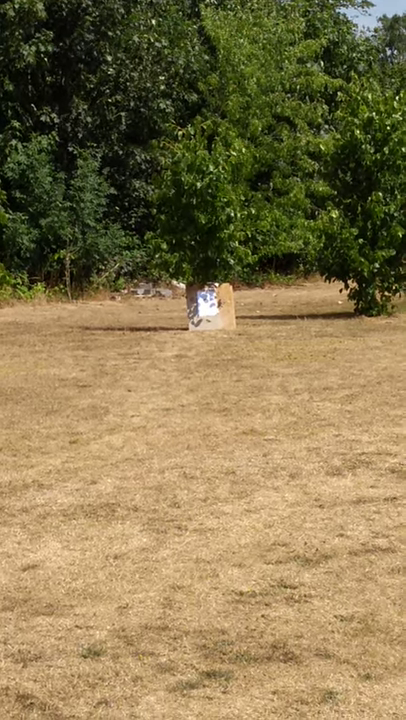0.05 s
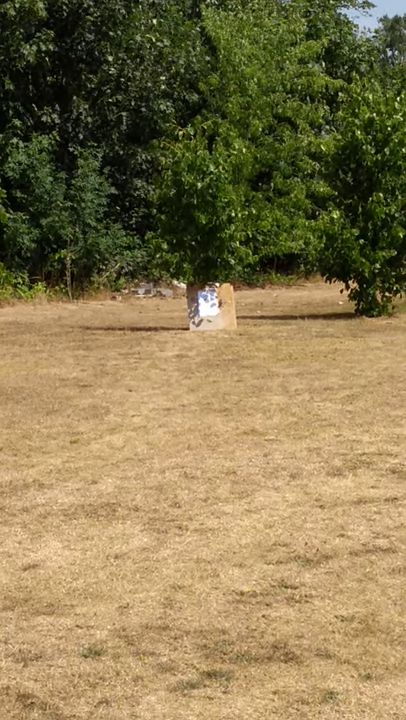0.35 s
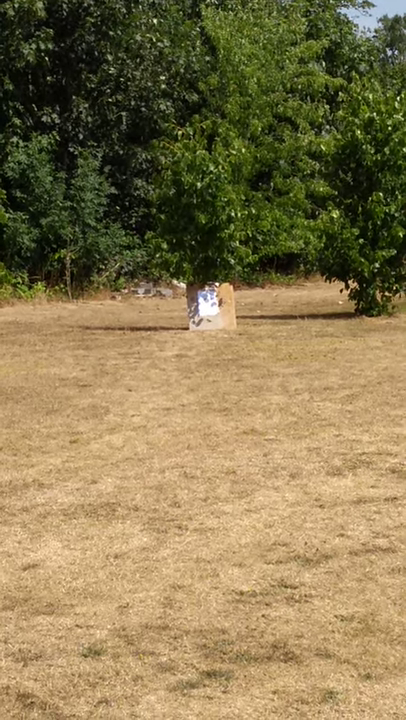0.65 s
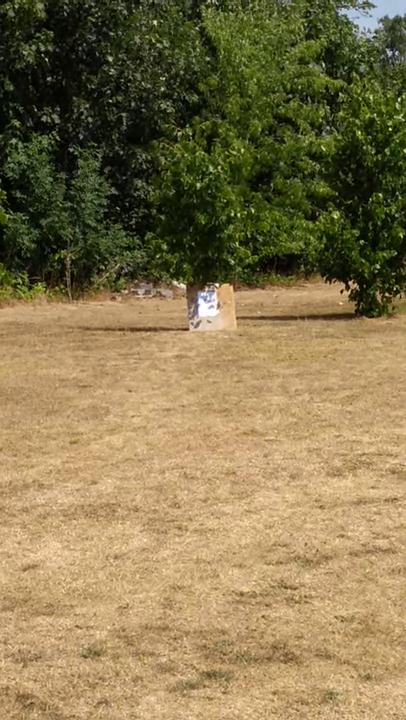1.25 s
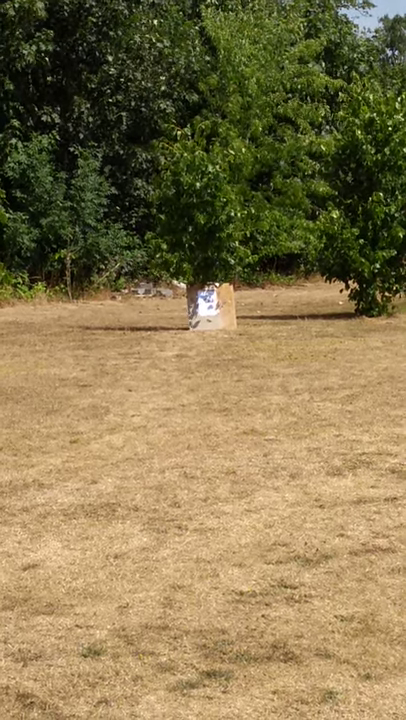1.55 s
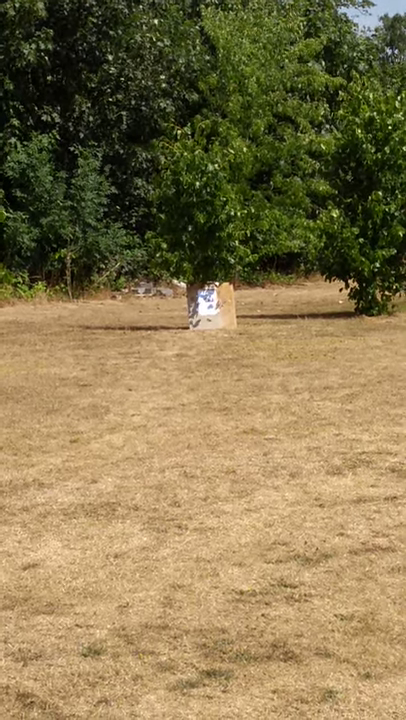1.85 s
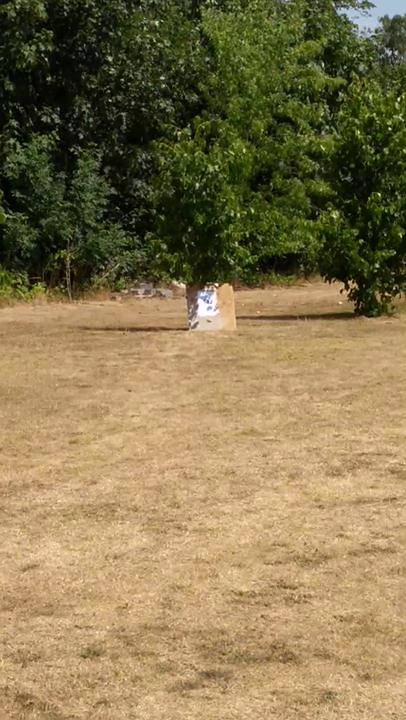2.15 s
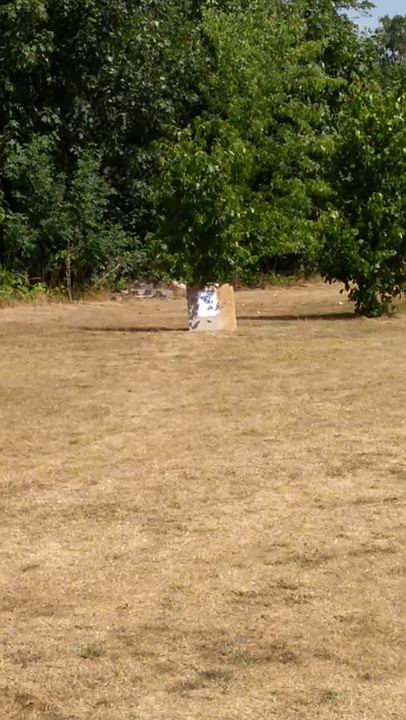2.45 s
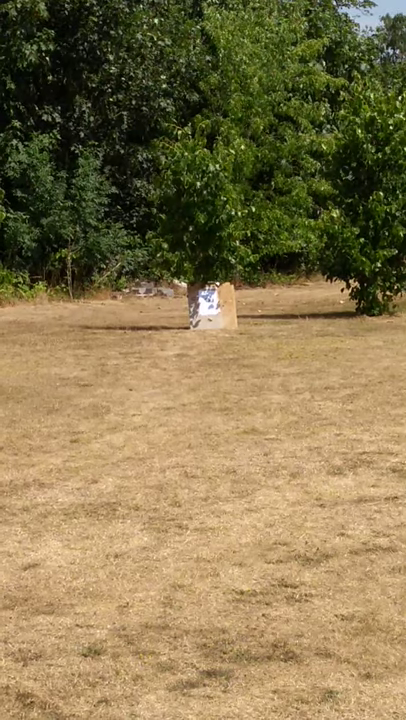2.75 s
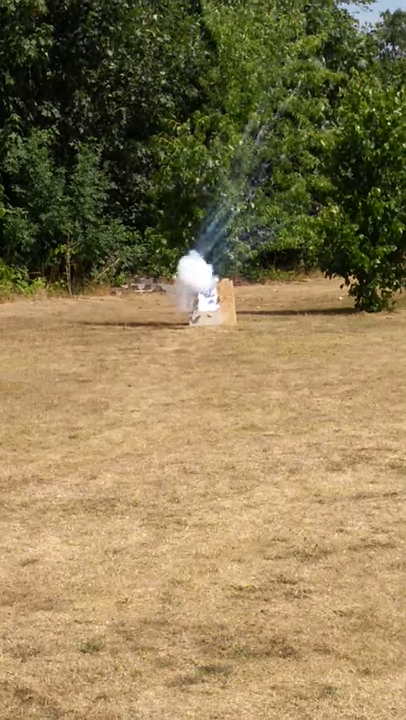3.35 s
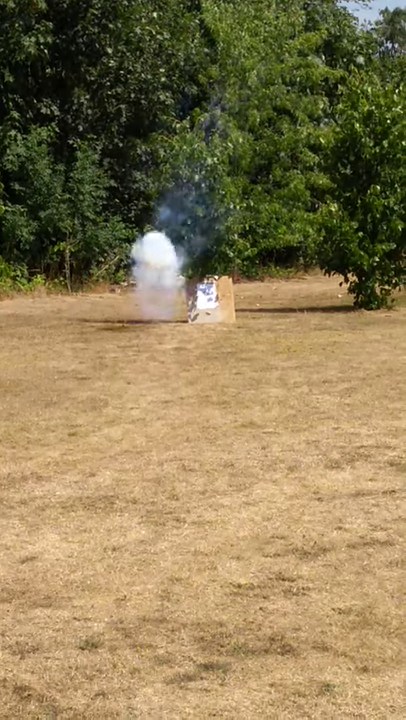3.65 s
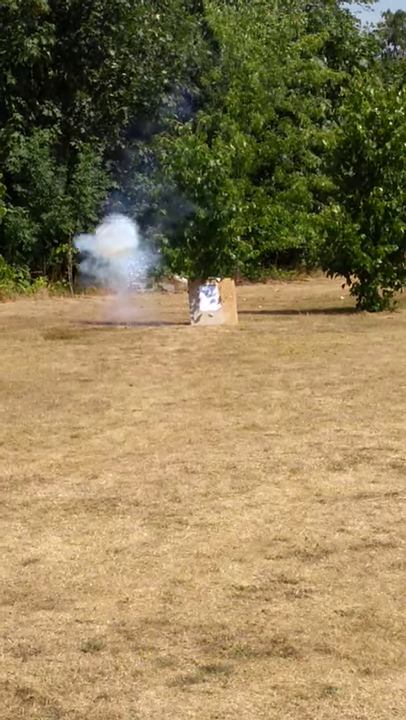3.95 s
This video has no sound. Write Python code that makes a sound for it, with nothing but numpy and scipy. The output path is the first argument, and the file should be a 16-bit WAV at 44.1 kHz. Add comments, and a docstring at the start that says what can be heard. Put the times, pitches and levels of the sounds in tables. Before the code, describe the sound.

An air rifle shot sets off an exploding target in an open field. The first three seconds are quiet: low rumble, soft microphone bumps, a faint distant dove, a few tiny chirps and a small twig snap at 2.5 seconds. The rifle cracks close by at 3.15 seconds with a brief metallic ring. The loud bang follows near 3.35, both distorting, and hissing echoes fade through 4 seconds.

```python
"""An air rifle and a small exploding target in a dry field, heard at a hand-held camera.
First still air and a low rumble, with a far dove, a small bird and handling bumps; at 2.5 s a twig snaps.
At 3.15 s the rifle fires close by: piston and muzzle pulses set its barrel and spring ringing.
A fifth of a second later the target's bang arrives; shot and bang both overload the microphone.
The wood behind the target scatters the bang back as a hissing tail with a few distinct echoes."""
import sys
import numpy as np
from scipy import signal
from scipy.fft import rfft, irfft
from scipy.io import wavfile
from scipy.ndimage import uniform_filter1d

SR = 44100
rng = np.random.default_rng(int(sys.argv[2]) if len(sys.argv) > 2 else 0)


def generate_wav(signal):
    """Clip the signal to [-1, 1] and save it as 16-bit WAV at the path in sys.argv[1]."""
    frames = np.transpose(np.atleast_2d(signal))
    scaled = np.clip(frames, -1, 1) * 32767
    pcm = np.round(scaled).astype(np.int16)
    wavfile.write(sys.argv[1], SR, pcm)


N = 176400
TIME = np.arange(N) / SR


def amp(db):
    return 10 ** (np.asarray(db) / 20)


def curve_at(points, hz):
    """A table's value at hz, on a log-frequency axis."""
    f, value = np.transpose(points)
    return np.interp(np.log(hz + 1), np.log(f + 1), value)


def since(start):
    """Seconds since start, zero before."""
    return np.maximum(TIME - start, 0)


def drift(hz):
    """Random modulation of rms 1, rolling off above hz."""
    x = irfft(rfft(rng.standard_normal(N)) / (1 + (np.fft.rfftfreq(N, 1 / SR) / hz) ** 4), N)
    return x / x.std()


def low_cut(x, hz):
    """Second-order high-pass."""
    return signal.sosfilt(signal.butter(2, hz, "high", fs=SR, output="sos"), x)


# stereo image of the noise layers (frequency [Hz], left-right correlation [0..1])
STEREO_IMAGE = [(30, 0.62), (500, 0.99), (1500, 1), (3000, 1), (5000, 0.87), (8000, 0.51), (14000, 0.85)]
def noise(spectrum, patchy_db, start=0, t60=None, size=256):
    """Stereo noise with a spectrum, random patches and, if given, a decay by band."""
    frames = dict(nperseg=size, noverlap=size * 3 // 4)
    hz, t, white = signal.stft(rng.standard_normal((2, N)), SR, **frames)
    alike = np.clip(curve_at(STEREO_IMAGE, hz), -1, 1)[:, None]
    mid, side = np.sqrt((1 + alike) / 2) * white[0], np.sqrt((1 - alike) / 2) * white[1]
    patches = uniform_filter1d(rng.standard_normal(mid.shape), size=5, axis=0)
    patches = uniform_filter1d(patches, size=5, axis=1)
    db = curve_at(spectrum, hz)[:, None] + patchy_db * patches / patches.std()
    if t60:
        db = db - 60 * np.maximum(t - start, 0) / curve_at(t60, hz)[:, None]
    return signal.istft(np.array([mid + side, mid - side]) * amp(db), SR, **frames)[1][:, :N]


def pulse(start, db, ms):
    """A blast wave: instant rise, a fall to zero in ms, then suction."""
    u = since(start) * 1000 / ms
    return amp(db) * np.clip((TIME - start) * SR, 0, 1) * (1 - u) * np.exp(-u)


def blasts(rows, low_hz):
    """Each blast wave drags a short turbulent hiss behind it."""
    hiss = sum(amp(db) * (TIME > s) * np.exp(-since(s) * 1000 / ms) for s, _, _, db, ms in rows)
    white = noise([(1, 0), (SR, 0)], patchy_db=0)
    return low_cut(sum(pulse(*row[:3]) for row in rows) + hiss * white, low_hz)


def ring(start, modes):
    """Damped modes struck together."""
    t = since(start)
    return sum(amp(db - 60 * t / t60) * np.sin(2 * np.pi * hz * t) for hz, db, t60 in modes)


def scatter(start, spectrum, t60, rise_s, flutter_db):
    """Countless small reflections that build up, flutter and die away."""
    swell = np.sqrt(np.minimum(since(start) / rise_s, 1))
    flutter = amp(flutter_db * drift(130))
    return swell * flutter * noise(spectrum, patchy_db=2, start=start + rise_s, t60=t60)


def smeared(call, fade_s):
    """A call as it arrives through foliage: a cloud of echoes that fades."""
    echoes = rng.standard_normal((2, SR // 2)) * np.exp(-TIME[:SR // 2] / fade_s)
    return signal.fftconvolve(call[None], echoes / np.linalg.norm(echoes[0]), axes=1)[:, :N]


# tone of the air bed and of the rumble (frequency [Hz], level [dB])
AIR_SPECTRUM = [(25, -56.5), (60, -39.5), (130, -39), (220, -46), (400, -45), (700, -46), (1300, -57.5),
                (2200, -57.5), (3400, -57), (8000, -58), (14000, -62)]
RUMBLE_SPECTRUM = [(25, -35), (70, -13), (130, 0), (200, -1), (280, -18), (400, -45), (1000, -41),
                   (14000, -86)]
# fader ride on the rumble (time [s], gain [dB])
RUMBLE_RIDE = [(0, -28), (.2, -25), (.4, -25), (.55, -16), (.75, -31.5), (1.05, -24.5), (1.2, -21),
               (1.5, -17.5), (1.8, -18.5), (2.1, -20.5), (2.25, -16), (2.5, -27), (2.72, -16), (2.9, -42),
               (4, -52)]
def field():
    """Steady outdoor hush and a low rumble that swells and fades."""
    ride = amp(np.interp(TIME, *np.transpose(RUMBLE_RIDE)) + .5 * drift(23))
    hush = noise(AIR_SPECTRUM, patchy_db=2, size=2048) * amp(.5 * drift(1))
    return hush + ride * noise(RUMBLE_SPECTRUM, patchy_db=1.06, size=2048)


# the dove's phrase (time [s], length [s], level [dB], start pitch [Hz], mid pitch [Hz], end pitch [Hz])
DOVE_COOS = [(0.117, 0.3, -52.5, 480, 491, 435), (1.137, .2, -52.5, 485, 449, 417),
             (1.809, 0.17, -51.5, 465, 495, 518), (1.92, 0.31, -55, 510, 532, 498),
             (2.213, .56, -54.5, 515, 501.7, 471.5), (2.695, 0.29, -60.5, 475, 464, 470),
             (2.897, .15, -48.5, 490, 465, 427)]
def dove():
    """Far, nearly pure coos on a curve of pitch, blurred by the trees."""
    out = np.zeros(N)
    blur = 1 + 0.99 * (drift(hz=38.45) + 1j * drift(hz=38.45))  # wavers both level and phase
    for start, length, db, *pitches in DOVE_COOS:
        u = np.minimum(since(start) / length, 1)
        hz = np.polyval(np.polyfit([0, .5, 1], pitches, 2), u)
        tone = (blur * np.exp(2j * np.pi * np.cumsum(hz) / SR)).real
        out += amp(db) * abs(np.sin(np.pi * u)) ** 0.69 * tone
    return out + amp(-2) * smeared(out, fade_s=0.034)[0]


# bird calls (time [s], level [dB], start pitch [Hz], end pitch [Hz], glide [s], tail decay [s])
BIRD_CHIPS = [(.15, -53, 4360, 4250, .03, 0.16), (.222, -50, 4380, 5330, 0.033, .04),
              (.610, -49, 5600, 4900, 0.0395, .06)]
def small_bird():
    """Thin gliding chips, each smeared by the foliage."""
    out = np.zeros((2, N))
    for start, db, start_hz, end_hz, glide, fade in BIRD_CHIPS:
        u = np.minimum(since(start) / glide, 1)
        hz = start_hz + (end_hz - start_hz) * u
        call = np.sin(np.pi * u) * np.sin(2 * np.pi * np.cumsum(hz) / SR)
        out += amp(db) * (0.33 * call + smeared(call, fade))
    return out


# thumps of the hand (time [s], level [dB], pitch [Hz])
HAND_BUMPS = [(0.491, -15, 130), (0.505, -23.5, 286), (0.516, -19.5, 232), (1.135, -26.5, 120),
              (1.677, -29, 130), (2.195, -23.5, 140), (2.244, -33, 100), (2.376, -32, 108),
              (2.591, -23, 160), (2.629, -19, 191), (2.630, -38, 357)]
def handling(decay_s=0.0037, dull_hz=445):
    """Soft, muffled bumps on the camera body, a few cycles at most."""
    out = np.zeros(N)
    for start, db, hz in HAND_BUMPS:
        u = since(start) / decay_s
        out += amp(db) * 2 * np.sqrt(u) * np.exp(-u) * np.sin(2 * np.pi * hz * since(start))
    return signal.sosfilt(signal.butter(3, dull_hz, fs=SR, output="sos"), out)


# the snap's wash: tone (frequency [Hz], level [dB]) and decay (frequency [Hz], t60 [s])
TWIG_SPECTRUM = [(1500, -79), (2400, -41), (3300, -51), (4300, -40), (5100, -37), (6200, -67), (12000, -70)]
TWIG_DECAY = [(2400, 0.1), (3500, 0.13), (5000, 0.27)]
def twig(snap_s=2.5):
    """One small dry snap and its short wash."""
    band = signal.butter(3, [2400, 5400], "band", fs=SR, output="sos")
    crack = signal.sosfilt(band, pulse(snap_s + .001, db=-24, ms=.1))
    return crack + scatter(snap_s, TWIG_SPECTRUM, TWIG_DECAY, rise_s=.001, flutter_db=0)


# tone of the deep wood and of the field's far edge (frequency [Hz], level [dB])
WOOD_SPECTRUM = [(60, -55.5), (200, -26.5), (500, -27), (1500, -32.5), (3400, -30.5), (5500, -26),
                 (8000, -38.5), (13000, -46)]
FAR_EDGE_SPECTRUM = [(60, -61), (400, -34.5), (900, -38), (1400, -30.5), (2000, -47), (3400, -49),
                     (6000, -53), (13000, -79)]
# decay of both (frequency [Hz], t60 [s])
WOOD_DECAY = [(200, 1.1), (1500, 2.4), (4000, 1.02), (13000, 0.2)]
def distant_tail():
    """The bang blooms in the deep wood, then slaps back from the far edge of the field."""
    wood = scatter(3.42, WOOD_SPECTRUM, WOOD_DECAY, rise_s=0.2, flutter_db=0.5)
    far_edge = scatter(3.955, FAR_EDGE_SPECTRUM, WOOD_DECAY, rise_s=0.0081, flutter_db=1.5)
    return wood + far_edge


# slaps off trees (time [s], pulse level [dB], pulse length [ms], hiss level [dB], hiss decay [ms])
TREE_SLAPS = [(3.3732, -8, 0.054, -13, 4.8), (3.4090, 8, 0.1, -22, 3), (3.4140, 3, 0.082, -25, 2),
              (3.4230, 11, 0.079, -4.5, 5.2), (3.4325, 1.5, 0.53, -9, 9.6), (3.4555, 4, 0.17, -7.5, 9.6),
              (3.4795, -2, 0.083, -9, 1.5), (3.5210, -14, 0.27, -11.5, 5.2), (3.5430, -7, 0.39, -28, 15),
              (3.6068, 1, 0.16, -11, 4.7), (3.6120, 7.5, 0.067, -30, 1.7), (3.6215, -9, 0.071, -40, 4.5),
              (3.6360, -15, .12, -23, 6.5), (3.6540, 1.5, 0.12, -22, 6.1), (3.7820, -26, 0.63, -42, 3.6),
              (3.9630, -26, .2, -52, 3.6)]
def tree_echoes(dull_hz=3615):
    """Single trees throw back distinct, dulled echoes of the bang."""
    return signal.lfilter(*signal.butter(1, dull_hz, fs=SR), blasts(TREE_SLAPS, low_hz=120))


# the leaves' wash: tone (frequency [Hz], level [dB]) and decay (frequency [Hz], t60 [s])
LEAF_SPECTRUM = [(60, -27.5), (200, -22.5), (370, -12.5), (700, -29.5), (1500, -8), (3400, -11),
                 (5500, -6.5), (8000, -9.5), (13000, -10)]
LEAF_DECAY = [(200, 1), (1500, 0.96), (4000, 0.55), (8000, 0.51), (13000, .38)]
def foliage(start, rise_s, flutter_db):
    """Near leaves scatter a blast into a bright, hissing tail."""
    return scatter(start, LEAF_SPECTRUM, LEAF_DECAY, rise_s, flutter_db)


# the shot's attack: piston, muzzle, reflection
# (time [s], pulse level [dB], pulse length [ms], hiss level [dB], hiss decay [ms])
SHOT_PULSES = [(3.1471, -2, 0.24, 2, 1.83), (3.1514, 19, 0.11, 5.5, 5.3), (3.1587, 20, 0.11, 4, 0.91)]
# ring of barrel and spring (frequency [Hz], level [dB], t60 [s])
RIFLE_RING = [(1116, -6, 0.034), (1446, -6, .035), (2080, -22, 0.038), (2790, -11, 0.031),
              (3200, -15.5, .03), (3458, -3, .035), (4049, -6, 0.038), (5130, -11, 0.041)]
# the wash off the grass: tone (frequency [Hz], level [dB]) and decay (frequency [Hz], t60 [s])
GRASS_SPECTRUM = [(60, -31), (200, -30.5), (420, -9), (900, -12.5), (1500, -12.5), (3400, -21), (7700, -16),
                  (13000, -21)]
GRASS_DECAY = [(200, .25), (1500, 0.17), (5000, .28), (13000, 0.2)]
def rifle():
    """Pressure pulses and ringing metal, a wash off the grass and a weak return from the foliage."""
    muzzle_s = SHOT_PULSES[1][0]
    direct = blasts(SHOT_PULSES, low_hz=40.4) + ring(muzzle_s, RIFLE_RING)
    grass = scatter(muzzle_s, GRASS_SPECTRUM, GRASS_DECAY, rise_s=.004, flutter_db=1)
    return direct + grass + amp(-31) * foliage(3.255, rise_s=.03, flutter_db=.7)


# the bang's attack: first crack, main blast, burst of fragments
# (time [s], pulse level [dB], pulse length [ms], hiss level [dB], hiss decay [ms])
BANG_PULSES = [(3.3594, 8.9, 0.48, 3.2, 4.6), (3.3616, 12.7, 0.4, 2.2, 3.9), (3.3640, 4, 0.048, 3.3, 1.7)]
# brief ring just after the bang (frequency [Hz], level [dB], t60 [s])
BANG_RING = [(323, -11.5, 0.047), (459, -14.5, 0.027), (910, -2, 0.013), (980, -3.5, 0.0083),
             (1670, -5, 0.023), (2547, -10.5, .03), (3304, -5.5, 0.058), (4060, -0.5, 0.036),
             (5360, -8.5, 0.02), (7480, -5.5, 0.04)]
def explosion(low_hz=230):
    """The target bursts with a brief ringing; single trees, near foliage and the distance answer."""
    blast_s = BANG_PULSES[1][0]
    direct = blasts(BANG_PULSES, low_hz) + low_cut(ring(blast_s, BANG_RING), low_hz)
    trees = tree_echoes()
    leaves = foliage(blast_s, rise_s=0.039, flutter_db=1)
    # the foliage also repeats the bang's ring, 5 ms behind its hiss
    tone = ring(0, BANG_RING)[:SR // 90]
    ringing = signal.fftconvolve(leaves, tone[None] / np.linalg.norm(tone), axes=1)[:, :N]
    ringing = amp(-11) * np.roll(ringing, SR // 200, axis=1)
    return direct + trees + leaves + ringing + distant_tail()


def scene():
    """Shot and bang over the quiet field and its small sounds."""
    return rifle() + explosion() + field() + handling() + dove() + small_bird() + twig()


# colour of the microphone behind its small port (frequency [Hz], gain [dB])
MIC_EQ = [(30, -17), (60, -18.5), (100, -23.5), (200, -19.5), (330, -11), (450, -8), (560, -8.5),
          (700, -9.5), (920, -5), (1100, -2), (1350, 0.5), (1700, -2.5), (2000, -8.5), (2270, -18),
          (2750, -8), (3100, -6.5), (3380, -3), (3700, -3.5), (4050, -8), (4600, -16.5), (5300, -5.5),
          (6000, -8), (6800, -15), (7750, -9), (8900, -14), (12000, -12.5), (14000, -24.5)]
def record(dry, overload=0.77, top_hz=14350):
    """Microphone colour, a slightly brighter right port, overload, then the band limit."""
    hz = np.fft.rfftfreq(8192, 1 / SR)
    tilt_db = curve_at([(1500, 0.084), (6000, 0.0), (12000, 0.48)], hz)
    channels = []
    for channel, sign in zip(dry, (-1, 1)):
        log_gain = np.log(amp(curve_at(MIC_EQ, hz) + sign * tilt_db))
        mirrored = np.r_[log_gain, log_gain[-2:0:-1]]
        impulse = np.fft.ifft(np.exp(np.conj(signal.hilbert(mirrored)))).real  # minimum phase
        channels.append(signal.fftconvolve(channel, impulse[:len(hz)])[:N])
    coloured = np.array(channels)
    clipped = coloured / (1 + (coloured / overload) ** 6) ** (1 / 6)
    crackle = low_cut(clipped - coloured, hz=330)  # the distortion carries no bass
    driven = low_cut(coloured + crackle, hz=103)  # the port's bass roll-off
    high_cut = signal.firwin(255, top_hz, window=("kaiser", 8), fs=SR)
    return signal.oaconvolve(driven, high_cut[None], "same")


dry = scene()
out = record(dry)
generate_wav(out)
```